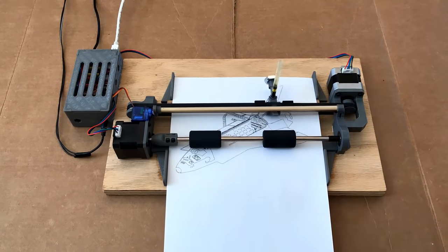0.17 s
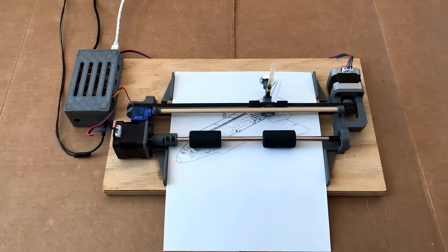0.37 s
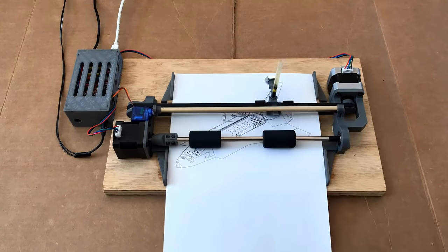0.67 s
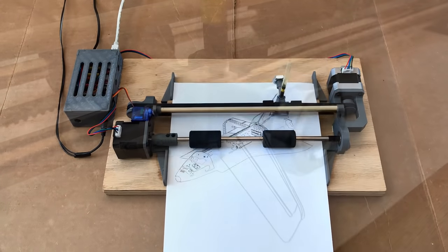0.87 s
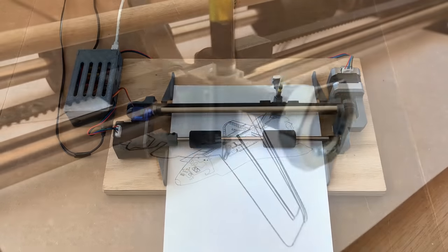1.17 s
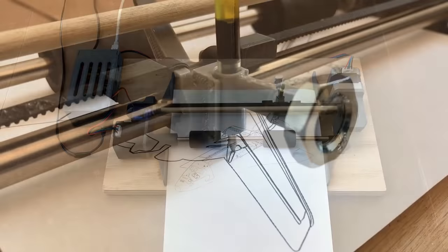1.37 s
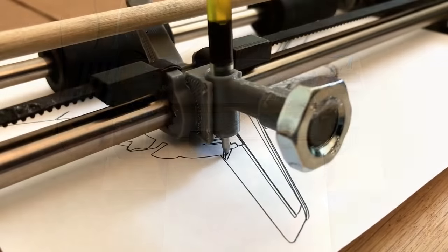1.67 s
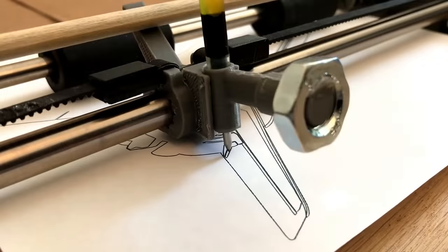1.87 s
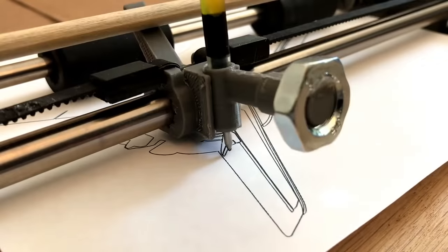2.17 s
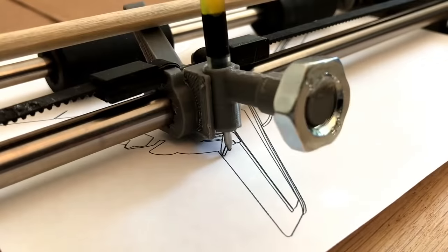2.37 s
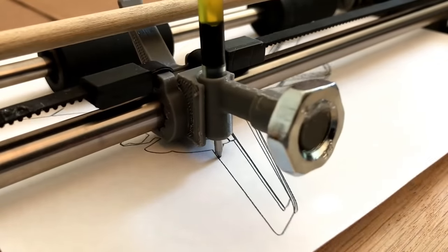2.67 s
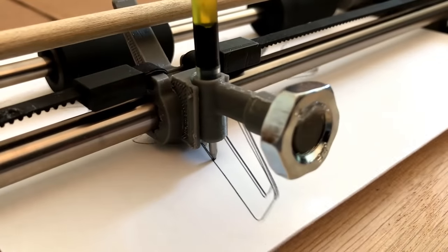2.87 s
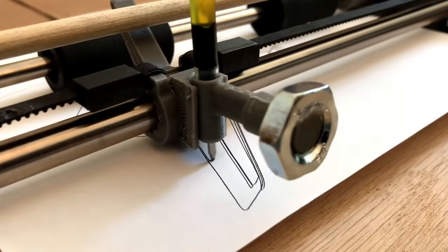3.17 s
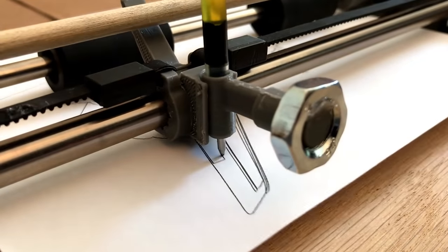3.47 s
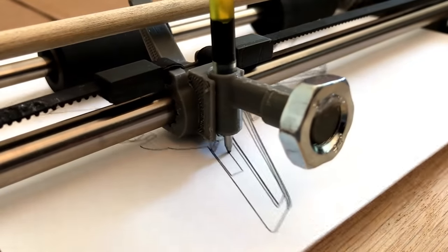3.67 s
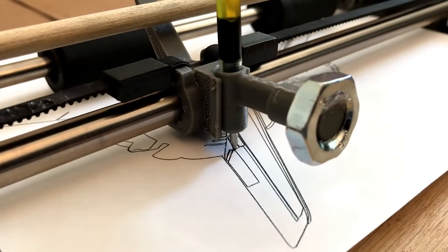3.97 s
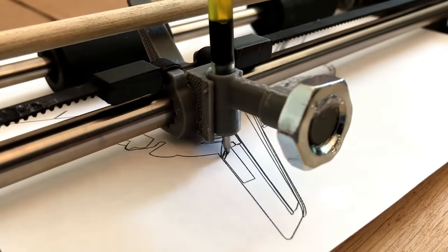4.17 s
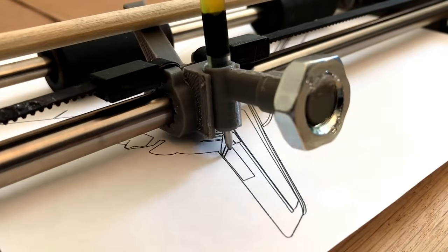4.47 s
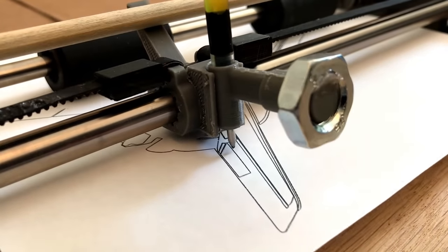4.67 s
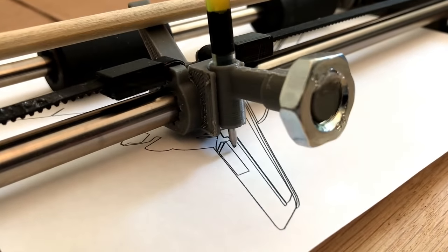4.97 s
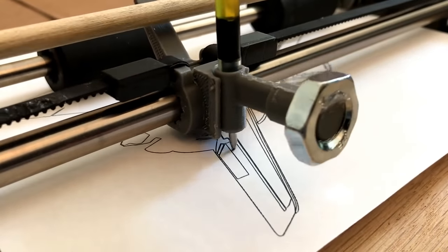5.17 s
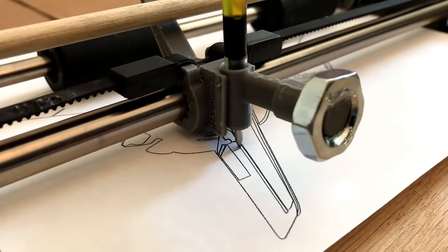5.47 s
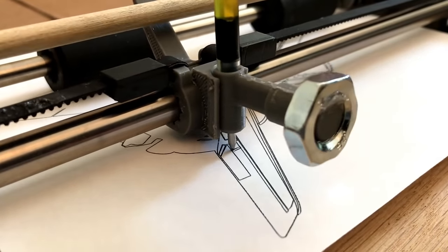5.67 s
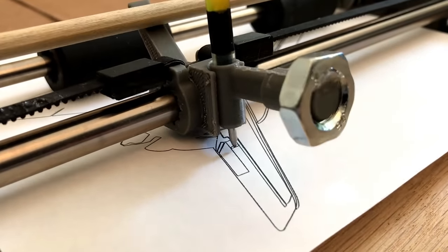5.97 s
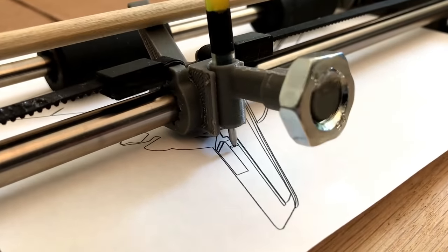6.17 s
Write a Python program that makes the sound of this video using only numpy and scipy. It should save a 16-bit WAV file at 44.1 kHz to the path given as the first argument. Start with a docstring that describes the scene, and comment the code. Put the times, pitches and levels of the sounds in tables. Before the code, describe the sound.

Silence until about 0.55 s, then quiet room tone and a very faint high coil whistle. At 0.75-0.86 s a tiny geared servo rasps, with sharp ticks and a light pen knock. From 0.8 to 1.7 s two stepper motors sing in five short buzzing strokes, pitch sweeping up and down, with frame rattle, clatter, hiss and low board rumble. A servo rasp and click come at 1.75 s, a tick at 2.03 s, a brief motor blip around 2.1 s, and a rasp with loud clicks at 2.45-2.55 s. The longest run, 2.5-4.25 s, has higher, longer whines, a squeaky edge and small part buzzes. Servo at 4.3 s, short motor burst at 4.6-4.8 s, servo at 5.1 s, quick lower strokes at 5.15-5.84 s, servo at 5.9 s, and a last short buzz near 6.2 s before a faint whistle. Close, small quiet room.

```python
"""A faint coil whistle over quiet room tone comes first: a small pen plotter at rest on a wooden board, close by.
A geared servo lowers the pen with a short rasp of clicks and noise through its ringing case; the pen knocks and ticks.
Two stepper motors then sing at step rates that rise and fall with every stroke, as stacks of sine partials.
Their steps, as clicks and noise through resonant bodies, rattle the frame, clatter, hiss and rumble.
Board resonances swell and a deep drone rolls in the bass; buzzes and a thin squeak ride on top."""
import sys
import numpy as np
from scipy import signal
from scipy.fft import rfft, irfft
from scipy.io import wavfile
from scipy.ndimage import uniform_filter1d

SR = 44100
rng = np.random.default_rng(int(sys.argv[2]) if len(sys.argv) > 2 else 0)


def materialize(psi):
    """Save the field psi as 16-bit PCM at rate SR to the path in sys.argv[1].

    A 1-D psi becomes a single channel; in a 2-D psi each row is a channel.
    """
    bounded = np.clip(np.atleast_2d(psi).T, -1, 1)
    quanta = np.round(bounded * 32767).astype(np.int16)
    wavfile.write(sys.argv[1], SR, quanta)


N = 279153
TIME = np.arange(N) / SR

# All levels are mix levels ahead of the layer trims and echoes.
# room tone, spectral shape: [f/Hz, level/dB]
ROOM_TONE = [(20, -6.5), (48, 0.5), (80, -4), (115, -7.5), (160, -4.5), (260, -3), (380, -12), (600, -17.5),
             (1100, -17.5), (2000, -26), (4000, -24), (8000, -26), (16000, -23)]
# coil whistle, one list of lines for each of four rest positions: [f/Hz, level/dB]
COIL_LINES = [
    [(2562, -70), (5130, -67.5), (7381, -80), (8403, -79), (12511, -74), (12823, -74), (15079, -95),
     (15391, -74)],
    [(2767, -63.5), (2961, -71.5), (8549, -75), (8882, -80), (10858, -81), (11843, -71), (12828, -76),
     (13819, -79)],
    [(1567, -66.5), (3128, -69.5), (6261, -82), (8554, -75), (10955, -79), (12129, -75), (12516, -74),
     (13695, -79), (14083, -82), (15649, -81)],
    [(1465, -68.5), (2930, -68.5), (6060, -58.5), (11000, -75)],
]
# time spent in each rest position: [start t/s, stop t/s]
COIL_RESTS = [
    [(.5, .79), (1.678, 2.022)],
    [(2.138, 2.495), (4.249, 4.59)],
    [(4.798, 5.15), (5.841, 6.181)],
    [(6.262, 6.4)],
]
# servo swings: [start t/s, full effort t/s, braking t/s, stop t/s, level/dB, direction: 0 lowers, 1 lifts the pen]
SERVO_SWINGS = [(.753, .78, .838, .858, -33, 0), (1.74, 1.765, 1.806, 1.85, -35, 1),
                (2.443, 2.474, 2.522, 2.548, -32.5, 0), (4.311, 4.34, 4.383, 4.42, -34, 1),
                (5.114, 5.13, 5.18, 5.21, -33.5, 0), (5.899, 5.935, 5.968, 6.005, -34, 1)]
# servo case resonances, lowering then lifting, as the gears bear on either flank: [f/Hz, width f/Hz, level/dB]
GEAR_MODES = [
    [(1010, 110, -29), (1590, 110, 1), (2200, 63, 0.5), (3350, 40, 6.5), (4220, 36, 7), (4580, 160, 5.5),
     (6620, 320, 5.5), (7300, 290, 0), (9720, 330, 2), (11200, 270, 4.5), (12800, 150, 5), (15400, 280, -6)],
    [(1447, 55, 4.5), (1620, 23, 8.5), (2180, 93, 3.5), (3394, 80, 6.5), (5030, 370, 3.5), (6130, 150, 2),
     (6400, 250, 4.5), (6830, 150, 10), (8550, 370, 2.5), (9400, 180, 2), (13100, 400, -1),
     (14100, 540, 1.5)],
]
# broad gear spectrum under those resonances: [f/Hz, level/dB]
GEAR_SPECTRUM = [(100, -17), (400, -5), (1000, -9.5), (1250, -24), (1950, -10), (3700, -10.5), (4800, -5),
                 (7200, -4.5), (8000, -3.5), (10200, -8.5), (11300, 1), (12100, -13), (16000, -0.5)]
# sharp ticks of play in the mechanism: [t/s, peak level/dB]
PLAY_TICKS = [(.771, -26), (1.01, -34), (1.623, -28), (1.762, -25), (2.031, -39), (2.111, -38),
              (2.494, -25), (2.5, -27), (3.128, -24)]
# pen holder knocking at the end of its travel: [t/s, peak level/dB]
PEN_KNOCKS = [(.806, -31), (1.782, -34), (2.491, -30), (4.361, -35), (5.155, -33.5), (5.946, -32)]
# board resonances: [f/Hz, width f/Hz, level/dB]
BOARD_MODES = [(160, 20, 0), (256, 30, -3)]
# broad board spectrum: [f/Hz, level/dB]
BOARD_SPECTRUM = [(30, -40), (70, -27.5), (130, -42), (200, -10.5), (310, -4.5), (420, -45), (900, -67)]
# frame resonances: [f/Hz, width f/Hz, level/dB]
FRAME_MODES = [(542, 21, 7.4), (677, 33, 7.4), (1040, 72, 5), (1623, 94, 1.2)]
# broad frame spectrum: [f/Hz, level/dB]
FRAME_SPECTRUM = [(100, -26), (250, -9), (400, 3.5), (600, -3.5), (900, 5), (1200, 1), (1400, -2.5),
                  (1950, -10), (3000, -22), (16000, -70)]
# rail resonances: [f/Hz, width f/Hz, level/dB]
RAIL_MODES = [(4020, 30, 0.75), (6830, 97, 2.3), (8670, 230, 5.5)]
# broad rail spectrum: [f/Hz, level/dB]
RAIL_SPECTRUM = [(500, -75), (2500, 8.5), (4500, 1.5), (7200, 0), (9400, -3), (10300, -3.5), (12700, 1.5),
                 (14500, -5), (16000, -3)]
# resonances of loose carriage parts: [f/Hz, width f/Hz, level/dB]
CLATTER_MODES = [(2600, 56, -6), (2820, 67, 4), (4270, 37, -3)]
# broad spectrum of those parts: [f/Hz, level/dB]
CLATTER_SPECTRUM = [(300, -35.5), (1500, -3), (2000, -9), (2400, 3), (3000, -5.5), (3500, -6), (4700, -15),
                    (7000, -16), (16000, -42.5)]
# motors running: [start t/s, stop t/s]
MOTOR_RUNS = [(.79, 1.678), (2.022, 2.138), (2.495, 4.249), (4.59, 4.798), (5.15, 5.841), (6.181, 6.27)]
# pen strokes: [middle t/s, length t/s, top carriage step f/Hz, top roller step f/Hz,
#   level/dB of carriage tone, roller tone, rattle, clatter, hiss]
PEN_STROKES = [(.883, 0.17, 930.4, 574.2, -53.5, -52, -43.5, -47.5, -51.5),
               (1.008, .14, 900, 229.3, -57, -57, -44, -49, -55.5),
               (1.217, 0.28, 1480, 831, -56, -50.5, -42, -50, -52),
               (1.404, 0.18, 829.7, 351.6, -64, -51, -43, -47.5, -55.5),
               (1.57, 0.19, 1028, 624.5, -57, -51.5, -44.5, -55, -53),
               (2.09, .17, 830.6, 305, -59, -57, -45, -51.5, -58),
               (2.602, 0.21, 1159, 656.9, -54, -53.5, -43.5, -49.5, -53),
               (2.898, 0.48, 1695, 673, -49.5, -55, -44, -54, -56),
               (3.268, 0.25, 1322, 184.8, -54, -54, -44.5, -57.5, -55),
               (3.689, 0.58, 1672, 736.3, -49.5, -55, -43, -52.5, -54.5),
               (4.13, .207, 1138, 589.2, -54, -55, -43.5, -50.5, -53),
               (4.697, .215, 1191, 751, -62, -50.5, -44, -50.5, -55.5),
               (5.267, .21, 1145, 274.5, -55, -65, -46, -58.5, -55.5),
               (5.441, .14, 965, 269.4, -56, -51.5, -44.5, -53.5, -58),
               (5.603, 0.21, 1151, 306.3, -53.5, -65, -49, -62, -55.5),
               (5.793, .16, 999.2, 290, -55.5, -52, -44, -55.5, -58),
               (6.233, 0.12, 750, 296.3, -58, -55, -44.5, -52.5, -59.5)]
# how speed tilts each part: [carriage step f/Hz, level/dB of tones, rattle, clatter, hiss]
SPEED_LAW = [(250, -3, -0.5, -1, -3.5), (560, -1.5, 1.5, -0.5, -3), (900, 0, -2, 0.5, 0),
             (1329.6, 1.5, -3, 0, .5), (1697.5, 0.5, -4.5, -1, 5)]
# corners of the drawing, where clatter and hiss dip: [t/s]
CORNER_TIMES = [1.075, 1.515, 2.655, 3.055, 3.1, 3.164, 3.378, 4.017, 5.32, 5.55]
# how well the frame radiates a motor tone: [f/Hz, level/dB]
TONE_RADIATION = [(60, -43), (150, 1.5), (260, 1.5), (380, -1), (540, 2.5), (660, 0), (850, 5), (1040, 6.5),
                  (1350, -4), (1680, -1.5), (2300, 7), (2800, -33), (3330, 10), (3500, 0), (5000, -13),
                  (9000, -18)]
# carriage motor partials at 1, 2, 3 and 4 times the step rate: [level/dB]
CARRIAGE_PARTIALS = [0.5, -13, -13, -23]
# roller motor partials at the same multiples: [level/dB]
ROLLER_PARTIALS = [0.5, -5, -13.5, -15]
# deep drone of belt and rollers: [f/Hz, level/dB]
DRONE_SPECTRUM = [(20, -9), (47, -3.5), (65, -1), (105, -10.5), (150, 4.5), (250, -21), (600, -76)]
# swells of the board's two low resonances, from jolts or from motor tones passing their pitch:
#   [t/s, lower mode level/dB, upper mode level/dB]
BOARD_SWELLS = [(.818, -54, -55), (1.098, -42.5, -50), (1.5, -38, -38), (1.68, -43, -50), (2.05, -51, -47),
                (2.12, -65, -44.5), (2.172, -49.5, -50), (2.526, -45, -43), (2.725, -66, -44),
                (3.068, -51, -41.5), (4.048, -36, -42.5), (4.252, -42, -43.5), (4.622, -48, -45),
                (4.82, -44, -46.5), (5.16, -56, -40.5), (5.4, -42.5, -46), (5.742, -41, -48),
                (5.856, -45.5, -46), (6.256, -47.5, -43)]
# loose parts briefly buzzing: [middle t/s, length t/s, f/Hz, level/dB]
PART_BUZZES = [(2.701, 0.078, 2659, -44.5), (3.564, 0.037, 2614, -42), (3.627, 0.027, 2240, -42.5),
               (3.951, 0.049, 2795, -45.5), (4.6, 0.024, 2798, -54)]

CRAWL_HZ, RAMP_S = 249.76, .224  # carriage step rate between strokes; longest ramp to top speed
SWELL_RISE_DB_PER_S, SWELL_FALL_DB_PER_S = 522, 392
START_S, EDGE_HZ = .558, 15850  # when the sound is switched in; upper band limit


def amp(db):
    """Decibels to a linear factor."""
    return 10 ** (np.asarray(db) / 20)


def evened(x):
    """Scales to rms 1."""
    return x / np.sqrt(np.mean(x ** 2) + 1e-20)


def read(points, hz):
    """A spectrum joined by straight lines on a log frequency axis."""
    f, db = np.transpose(points)
    return np.interp(np.log(hz + 1), np.log(f + 1), db)


def during(spans):
    """1 inside the spans, 0 outside, with quick soft edges."""
    gate = sum(1. * ((TIME > start) & (TIME < stop)) for start, stop in spans)
    return uniform_filter1d(gate, size=130)


def sine(hz):
    """A sine that follows a gliding frequency."""
    return np.sin(2 * np.pi * np.cumsum(hz) / SR)


def body(spectrum, modes=()):
    """Causal impulse response, energy 1, of a broad spectrum with resonances."""
    hz = abs(np.fft.fftfreq(2 ** 14, 1 / SR))
    power = amp(read(spectrum, hz)) ** 2
    for f, width, db in modes:
        peak = 1 / (1 + (2 * (hz - f) / width) ** 2)
        skirt = 1 / (1 + (2 * (hz - f) / f) ** 2) ** 2  # keeps the far slopes steep
        power = power + amp(db) ** 2 * peak * skirt
    # minimum phase: the log magnitude's Hilbert transform supplies the phase
    minimum_phase = np.exp(signal.hilbert(np.log(power) / 2).conj())
    ring = np.fft.ifft(minimum_phase).real[:len(hz) // 2]
    return ring / np.linalg.norm(ring)


def through(x, response):
    """Plays a signal through an impulse response."""
    return signal.oaconvolve(x, response)[:N]


def wander(hz):
    """Slow chance, rms 1, fading out above about the given rate."""
    spectrum = rfft(rng.standard_normal(N))
    keep = np.exp(-(np.fft.rfftfreq(N, 1 / SR) / hz) ** 2)
    return evened(irfft(spectrum * keep, N))


def impacts(rate, spread_db):
    """One click a cycle, of uneven size and random sign, at a constant mean power."""
    hit = np.diff(np.floor(np.cumsum(rate) / SR), prepend=0)
    size = amp(spread_db * np.clip(rng.standard_normal(N), -2, 1))
    sign = rng.choice([-1, 1], N)
    return evened(hit * size * sign / np.sqrt(rate))


def scatter(t60, share):
    """A direct blow followed by a dying scatter of noise, 60 dB down after t60 seconds."""
    t = np.arange(SR // 2) / SR
    tail = rng.standard_normal(len(t)) * amp(-60 * t / t60)
    response = (t == 0) + share * tail / np.linalg.norm(tail)
    return response / np.linalg.norm(response)


def blows(rows, response):
    """Strikes one response at the given times and peak levels."""
    hits = np.zeros(N)
    for s, db in rows:
        hits[round(s * SR)] = amp(db)
    return through(hits, response / abs(response).max())


def room_tone(level_db=-60.5):
    """Steady noise shaped like the air of a quiet room."""
    return amp(level_db) * through(rng.standard_normal(N), body(ROOM_TONE))


def coils(waver=0.071):
    """The chopped holding current whistles at pitches that depend on where the rotors stand."""
    whistle = np.zeros(N)
    for lines, spans in zip(COIL_LINES, COIL_RESTS):
        chord = sum(amp(db) * np.sin(2 * np.pi * hz * TIME) for hz, db in lines)
        whistle += during(spans) * chord
    return np.sqrt(2) * whistle * (1 + waver * wander(60))


def servo(mesh_hz=2200, spread_db=3, rasp=0.82, start_share=0.22, throb_db=2.07):
    """Small plastic gears swell, rasp and fade; their teeth ring the servo case."""
    teeth = impacts(mesh_hz * amp(1.5 * wander(60)), spread_db)
    grind = evened(teeth + rasp * rng.standard_normal(N))
    drive = grind * amp(throb_db * wander(115))
    effort = np.zeros((2, N))  # lowering, lifting
    for start, full, brake, stop, db, direction in SERVO_SWINGS:
        times = [start, full, brake, (brake + stop) / 2, stop]
        swell = np.interp(TIME, times, [start_share, 1, 1, .35, .06], 0, 0)
        effort[round(direction)] += amp(db) * swell
    return sum(through(push * drive, body(GEAR_SPECTRUM, modes)) for push, modes in zip(effort, GEAR_MODES))


def pen(frame_share=0.58, knock_db=-1):
    """The pen holder thumps frame and board; slack parts tick against the rails."""
    thump = body(BOARD_SPECTRUM, BOARD_MODES) + frame_share * body(FRAME_SPECTRUM, FRAME_MODES)
    knock = signal.fftconvolve(thump, scatter(t60=0.086, share=0.55))
    snap = body(RAIL_SPECTRUM, RAIL_MODES) + .6 * body(CLATTER_SPECTRUM, CLATTER_MODES)
    tick = signal.fftconvolve(snap, scatter(t60=.011, share=3))
    return amp(knock_db) * blows(PEN_KNOCKS, knock) + blows(PLAY_TICKS, tick)


def motion():
    """Strokes ramp up from a crawl and back, setting both step rates and the gains of the five motor parts."""
    middle, length, carriage_top, roller_top, *levels = np.transpose(PEN_STROKES)
    to_edge = length / 2 - abs(TIME[:, None] - middle)
    ramp = np.minimum(to_edge / np.minimum(length / 2, RAMP_S), 1)
    now = ramp.argmax(1)  # the stroke furthest up its ramp is the current one
    carriage_hz = CRAWL_HZ + (carriage_top[now] - CRAWL_HZ) * np.maximum(ramp.max(1), 0)
    roller_hz = carriage_hz * (roller_top / carriage_top)[now]
    speed_hz, tone, *shakes = np.transpose(SPEED_LAW)
    gains = []
    for db, law in zip(levels, [tone, tone, *shakes]):
        stroke_db = uniform_filter1d(db[now], size=900)
        gains.append(amp(stroke_db + np.interp(carriage_hz, speed_hz, law)))
    return carriage_hz, roller_hz, np.array(gains) * during(MOTOR_RUNS)


def corner_dips(width_s=0.0077, dip_db=-10):
    """The level dips for an instant at each corner."""
    return amp(dip_db * sum(np.exp(-((TIME - s) / width_s) ** 2) for s in CORNER_TIMES))


def whine(hz, gain, partials, flutter=0.0031, rough=0.19):
    """A motor sings at multiples of its step rate; the rotor hunts a little around its pace."""
    phase = 2 * np.pi * np.cumsum(hz * (1 + flutter * wander(63.0))) / SR
    tone = np.zeros(N)
    for k, db in enumerate(partials, 1):
        waver = 1 + k * rough * wander(38)  # the higher partials waver more
        tone += amp(db + read(TONE_RADIATION, k * hz)) * np.sin(k * phase) * waver
    return np.sqrt(2) * gain * tone


def steppers(carriage_hz, roller_hz, gains, tone_db=1.5, frame_db=-3.37, clatter_db=2, hiss_db=4.5,
             rumble_db=-8, grit=0.98, rub=1.0, uneven_db=1.75):
    """Tones of both motors, and the rumble, rattle, clatter and hiss that their steps shake out of the machine."""
    rattling, clattering, sliding = gains[2:] * amp(uneven_db * wander(55))
    tones = whine(carriage_hz, gains[0], CARRIAGE_PARTIALS) + whine(roller_hz, gains[1], ROLLER_PARTIALS)
    # parts are struck once per winding cycle of the carriage motor and once per roller step
    cycles = impacts(carriage_hz / 4, spread_db=4)
    steps = evened(cycles + 1.38 * impacts(roller_hz, spread_db=4))
    dips = corner_dips()
    shaking = evened(steps + grit * rng.standard_normal(N))
    rattle = through(rattling * shaking, body(FRAME_SPECTRUM, FRAME_MODES))
    jostling = evened(evened(cycles + steps) + .25 * rng.standard_normal(N))
    clatter = through(dips * clattering * jostling, body(CLATTER_SPECTRUM, CLATTER_MODES))
    rubbing = evened(steps + rub * rng.standard_normal(N))
    hiss = through(dips * sliding * rubbing, body(RAIL_SPECTRUM, RAIL_MODES))
    rumble = through(rattling * steps, body(BOARD_SPECTRUM, BOARD_MODES))
    high = amp(clatter_db) * clatter + amp(hiss_db) * hiss
    low = amp(frame_db) * rattle + amp(rumble_db) * rumble
    return amp(tone_db) * tones + low + high


def squeal(sliding, hz=8600, level_db=-9):
    """A thin, flickering squeak follows the gain of the sliding hiss."""
    flicker = np.clip(wander(35), 0, 1.3)
    drift = .01 * wander(60) + .006 * wander(400)
    return amp(level_db) * sliding * evened(flicker * sine(hz * (1 + drift)))


def boom(carriage_hz, carriage_gain, level_db=7, hz=158, width_hz=13):
    """The drive wobbles once every eight steps; the board booms as that rate sweeps through its resonance."""
    wobble = carriage_gain * sine(carriage_hz / 8)
    resonance = signal.iirpeak(hz, hz / width_hz, SR)
    return np.sqrt(2) * amp(level_db) * signal.lfilter(*resonance, wobble)


def rolling(speed, level_db=-57):
    """Belt and rollers give a deep drone of shaped noise that grows with speed."""
    drone = through(rng.standard_normal(N), body(DRONE_SPECTRUM))
    return amp(level_db) * during(MOTOR_RUNS) * speed / speed.max() * drone


def board_swells(lower_db=-2, upper_db=-3.5, drift=.07):
    """The board's two low resonances swell and die away, as wavering sines at set times."""
    s, *levels = np.transpose(BOARD_SWELLS)
    age = TIME[:, None] - s
    shape_db = np.minimum(SWELL_RISE_DB_PER_S * age, -SWELL_FALL_DB_PER_S * age)
    ringing = np.zeros(N)
    for mode, db, trim in zip(BOARD_MODES, levels, (lower_db, upper_db)):
        swell = amp((shape_db + db).max(1) + trim)  # the loudest swell wins
        ringing += swell * sine(mode[0] * (1 + drift * wander(34.1)))
    return np.sqrt(2) * ringing


def buzzes(drift=0.045):
    """Each loose part rings near its own pitch, swelling and dying away."""
    clock = np.cumsum(1 + drift * wander(262)) / SR  # seconds that run unevenly
    buzz = np.zeros(N)
    for s, length, hz, db in PART_BUZZES:
        swell = amp(db) * np.exp(-(2 * (TIME - s) / length) ** 2)
        buzz += swell * np.sin(2 * np.pi * hz * clock)
    return buzz * (1 + .5 * wander(249.6))


def scene(servo_db=0.3, room_t60=0.24, room_share=0.14):
    """The machine on its board, with a short echo from the table and a faint one from the quiet room."""
    carriage_hz, roller_hz, gains = motion()
    machine = amp(servo_db) * servo() + pen() + steppers(carriage_hz, roller_hz, gains)
    machine = through(machine, scatter(t60=.06, share=.22))  # table
    machine = through(machine, scatter(room_t60, room_share))
    bass = boom(carriage_hz, gains[0]) + rolling(carriage_hz) + board_swells()
    return (room_tone() + coils() + machine + squeal(gains[-1]) + bass + buzzes())[None]


def record(dry):
    """Silence until the sound is switched in; then the band limit."""
    lowpass = signal.firwin(511, EDGE_HZ, window=("kaiser", 9), fs=SR)
    return signal.oaconvolve(dry * during([(START_S, np.inf)]), lowpass[None], "same")


dry = scene()
out = record(dry)
materialize(out)
```